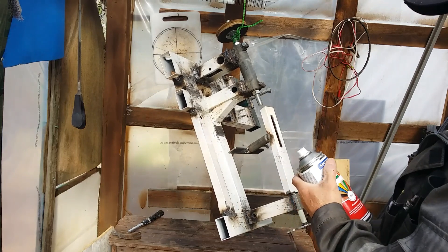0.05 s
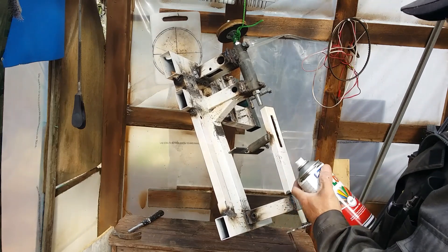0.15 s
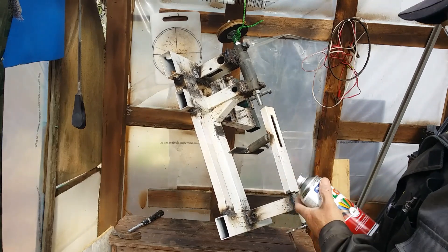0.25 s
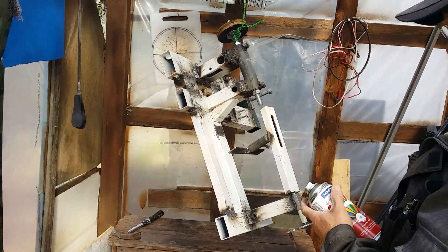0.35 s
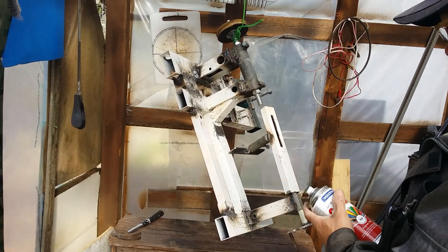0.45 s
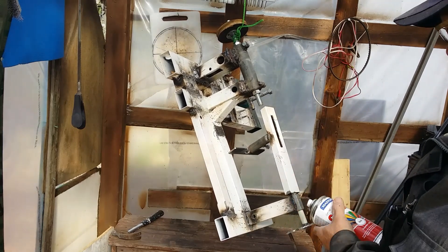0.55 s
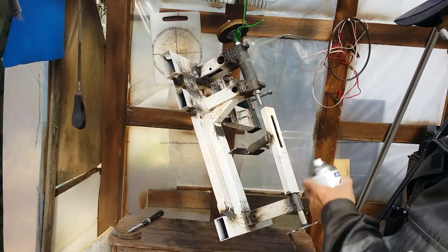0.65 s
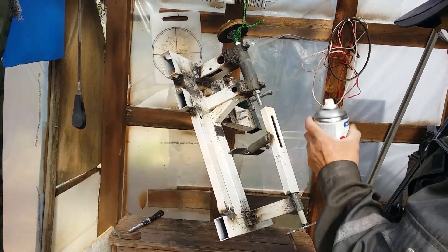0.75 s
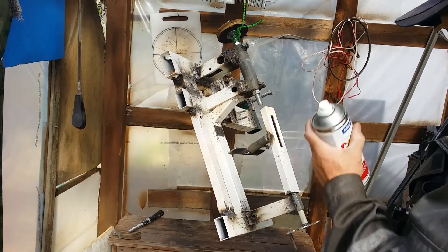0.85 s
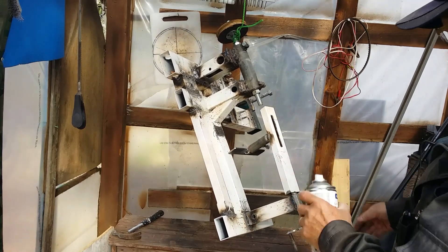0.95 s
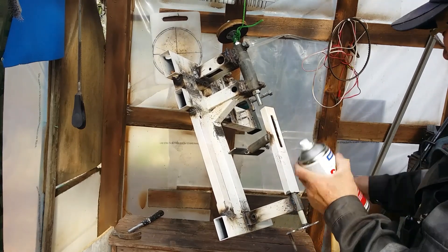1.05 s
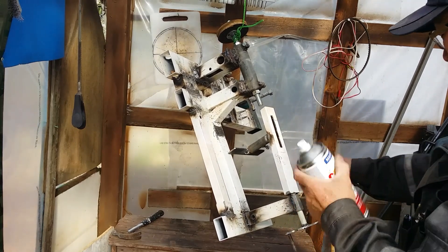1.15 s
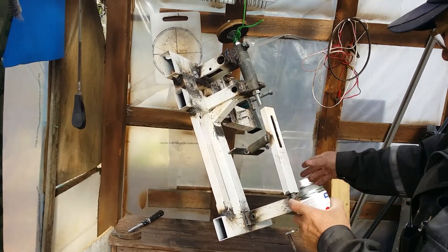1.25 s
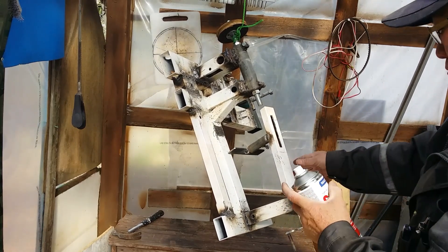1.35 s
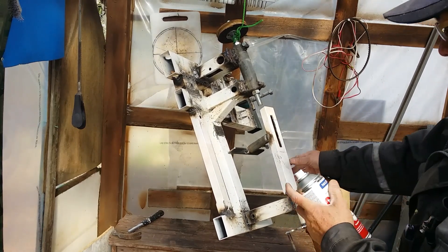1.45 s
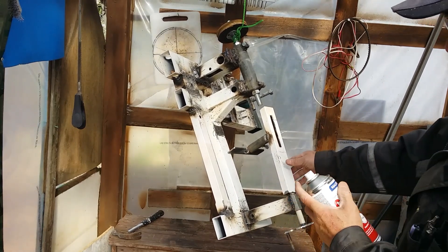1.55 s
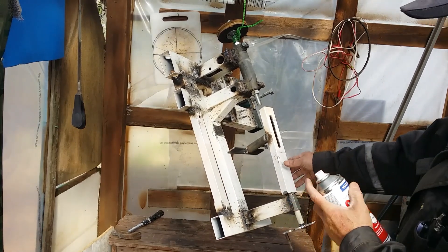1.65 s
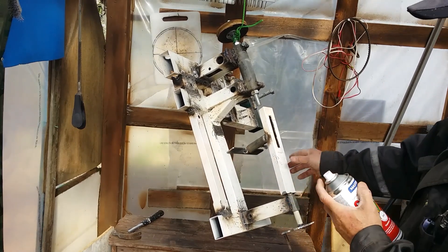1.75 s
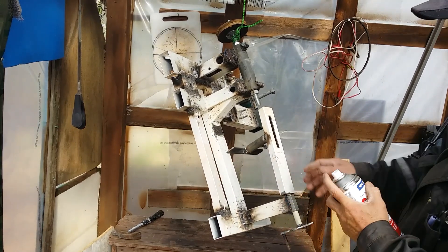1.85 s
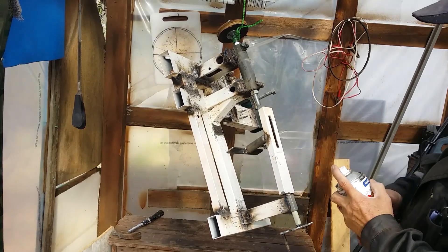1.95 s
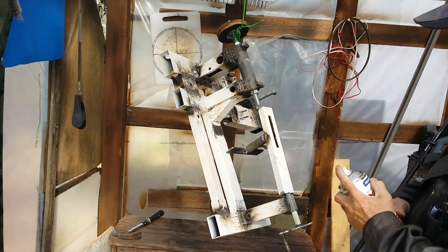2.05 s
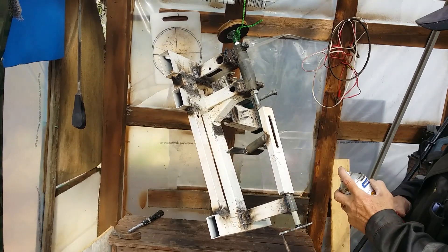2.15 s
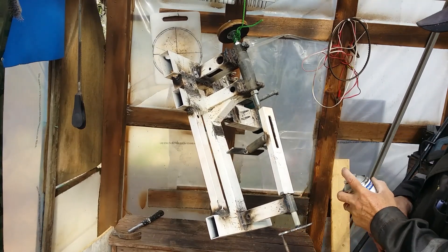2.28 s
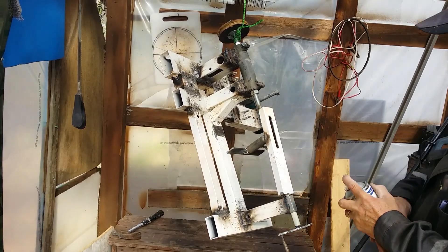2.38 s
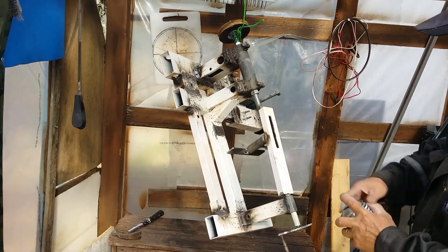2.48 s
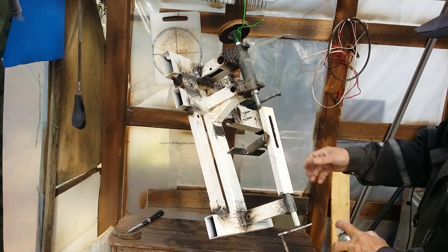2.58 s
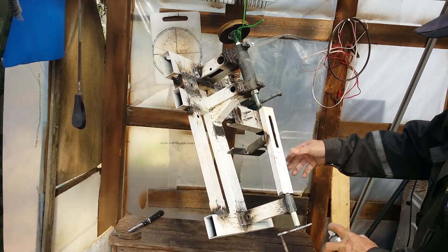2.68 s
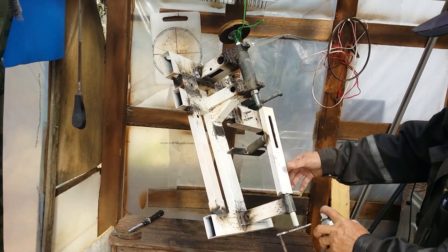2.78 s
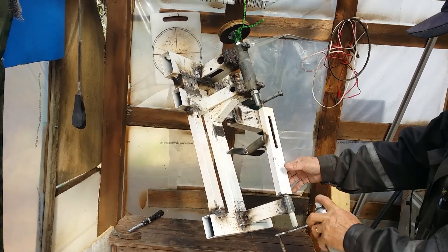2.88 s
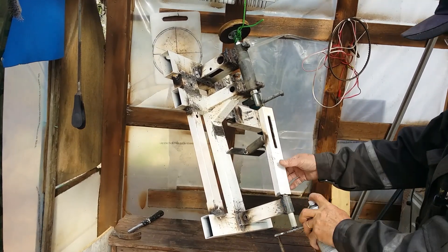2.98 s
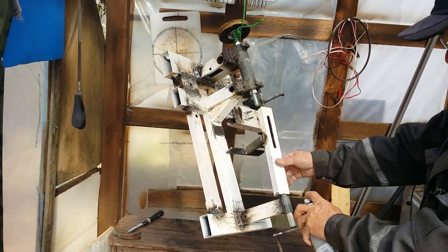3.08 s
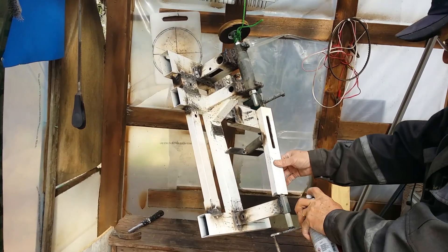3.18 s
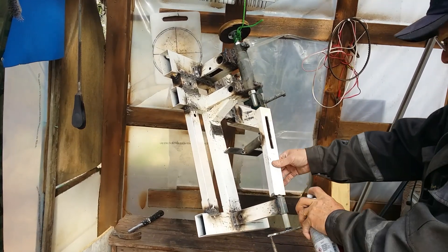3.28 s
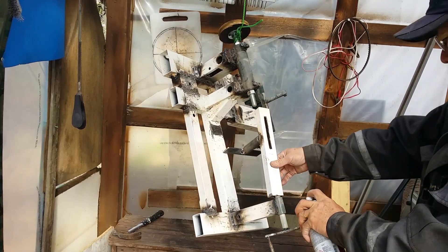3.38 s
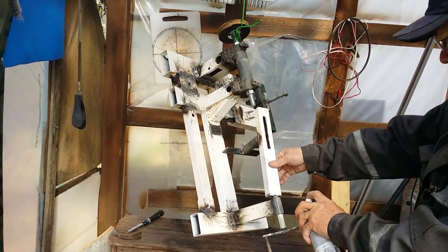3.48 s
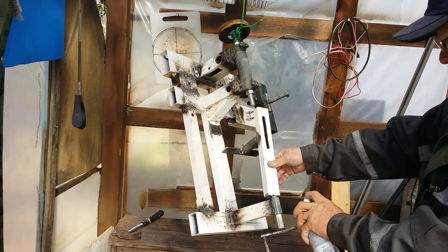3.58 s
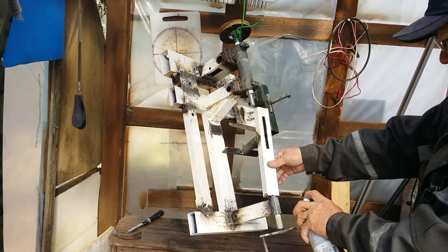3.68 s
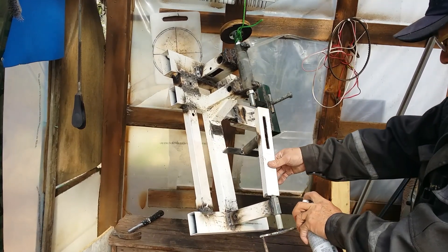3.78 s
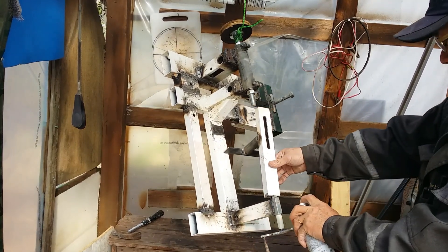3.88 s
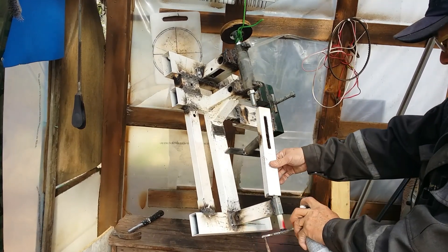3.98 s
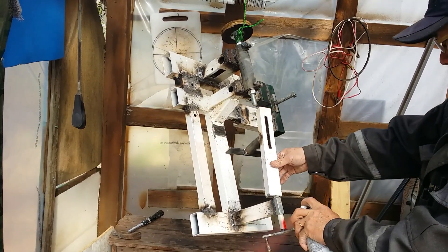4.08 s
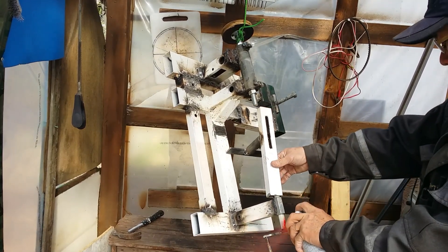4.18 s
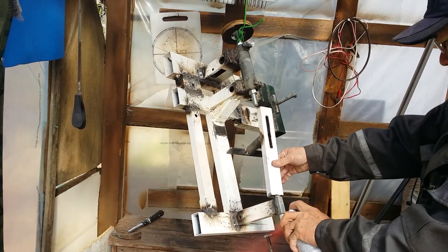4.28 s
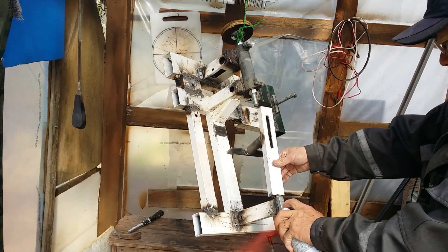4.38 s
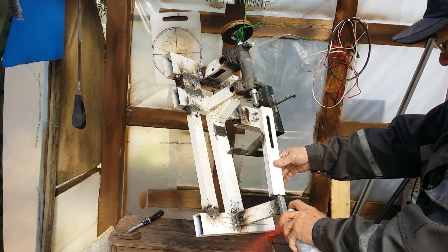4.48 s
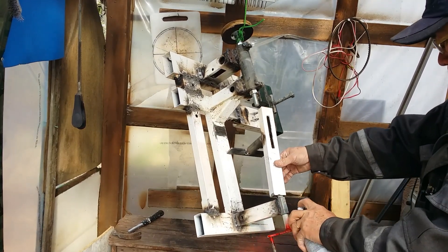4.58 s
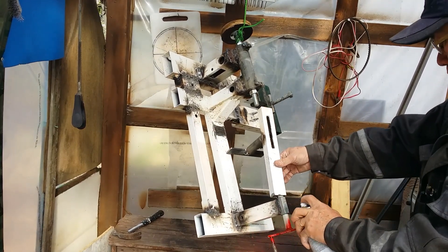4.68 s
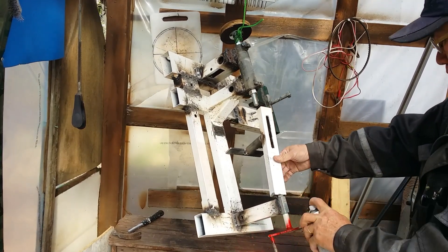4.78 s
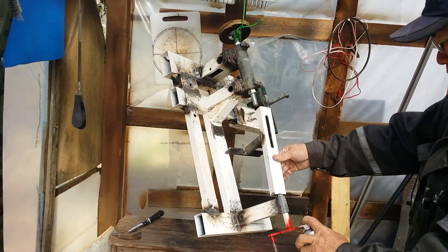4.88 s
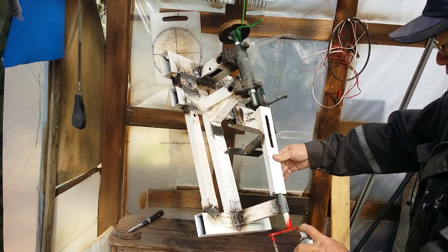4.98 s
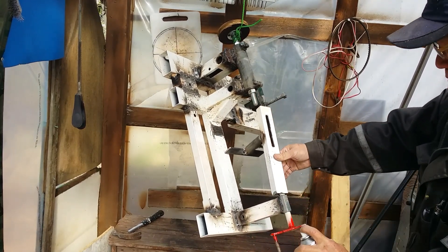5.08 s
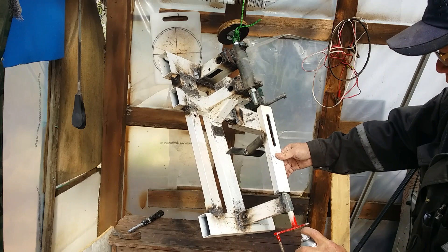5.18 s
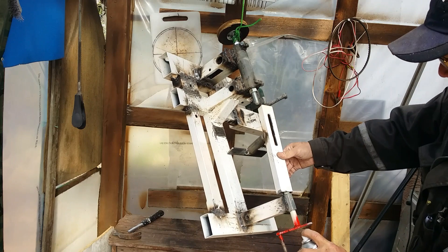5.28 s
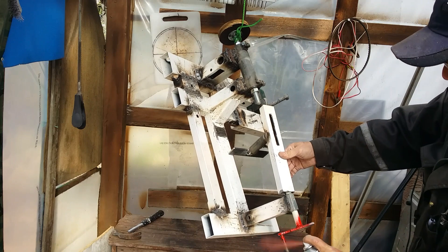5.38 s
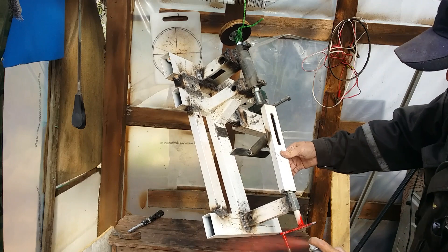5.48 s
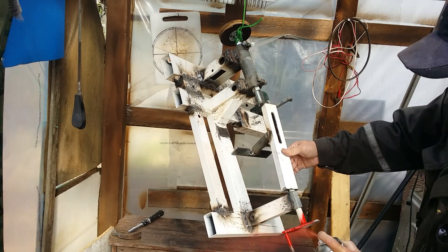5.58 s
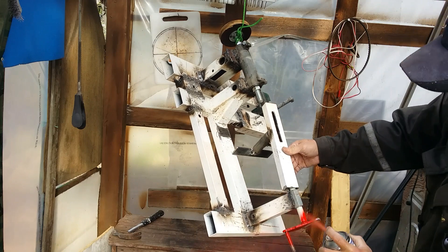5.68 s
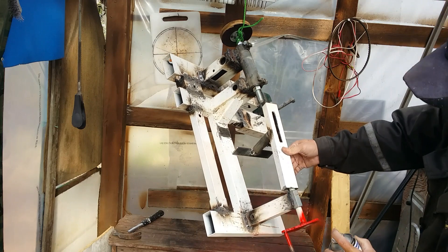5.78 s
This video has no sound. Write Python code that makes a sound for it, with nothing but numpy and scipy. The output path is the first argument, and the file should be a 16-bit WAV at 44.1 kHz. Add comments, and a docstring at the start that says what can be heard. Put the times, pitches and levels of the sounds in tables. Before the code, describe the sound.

In a small shed, the ball in a spray paint can rattles with sharp, irregular metallic knocks, along with soft bumps and some clothing rustle. After a quieter stretch with a brief brush of a hand on metal, the nearby can hisses for under a second, pauses, and hisses again briefly. A far engine hums very faintly behind it all.

```python
"""Spray can in a small shed

A spray can is swung about: its mixing ball knocks and skids inside the steel shell. A sleeve rustles,
a hand takes hold of a metal frame with a soft bump, and the nozzle lets out two turbulent jets.
Outdoor air noise and a far engine come through the thin walls; the recorder's noise suppressor
turns them down in the pauses."""
import sys
import numpy as np
from scipy import signal
from scipy.fft import rfft, irfft, next_fast_len
from scipy.io import wavfile
from scipy.ndimage import uniform_filter1d, map_coordinates

SR = 44100
rng = np.random.default_rng(int(sys.argv[2]) if len(sys.argv) > 2 else 0)


def wav_record(signal):
    """Record a signal, one row per channel, as 16-bit PCM in the file named by sys.argv[1]."""
    frames = np.transpose(np.atleast_2d(signal))
    bounded = np.clip(frames, -1, 1)
    # unit amplitude maps onto the largest positive 16-bit level
    quanta = np.round(bounded * 32767).astype(np.int16)
    wavfile.write(sys.argv[1], SR, quanta)


N = 257544
TIME = np.arange(N) / SR

# dull noise of moving air: (frequency [Hz], level [dB])
DULL_AIR = [(45, -23.5), (75, 1), (100, 2.5), (140, -5), (190, 0), (280, 0.5), (450, -3.5), (950, -9.5),
            (1400, -17.5), (2500, -30), (6000, -55)]


def rattle(gain_db=20, chatter_per_s=36, chatter_hz=2086, scatter_octaves=0.28, spread_db=2.5):
    """The mixing ball knocks about the can, then chatters lightly on random spots as a swing dies."""
    # ball hits, with the finger's tap on the nozzle cap at 4.06 s among them; hollowness is high on the thin
    # side wall and low on the stiff ends: (time [s], strength [dB], hollowness [dB], ring centre of the spot
    # [Hz], skid [dB])
    hits = [(0.000, -30, -1.5, 1983, -3), (0.041, -38.5, 5, 1600, -6.5), (0.124, -48.5, 5, 2500, -11.5),
            (0.14, -37.5, 3.5, 1915, -14.5), (0.178, -29.5, -5.5, 2450, -0.5), (0.201, -24, -6.5, 1230, -6),
            (0.261, -39.5, -1.5, 2400, 4), (0.301, -45, 10, 1808, 0), (0.352, -34, 2, 2500, -4.5),
            (0.359, -34, -0.5, 2520, -4.5), (0.382, -36.5, -2.5, 1500, -6), (0.495, -35.5, -3.5, 2430, -12),
            (0.517, -36, -3, 2720, -0.5), (1.105, -36.5, 4, 2408, -7.5), (1.171, -31.5, 3, 2840, -11),
            (1.189, -26.5, 0.5, 2888, -10), (1.219, -15.5, 0, 2475, -3.5), (1.234, -21.5, -10, 2380, -4.5),
            (1.276, -29.5, 4, 1810, -5), (1.347, -32, 3.5, 1500, -16), (1.369, -31, 0.5, 2800, -4),
            (1.381, -32.5, 2, 1600, -3.5), (1.386, -14.5, -10.5, 4960, -14.5), (1.425, -31, 8, 2214, -4.5),
            (1.434, -31.5, 7, 2120, -6.5), (1.442, -30, 9, 1584, -13.5), (1.463, -35, 2, 1580, -3),
            (1.502, -36, -1.5, 5476, -8), (1.514, -17.5, -2.5, 5000, -2), (1.528, -21, -6.5, 4800, -8.5),
            (1.578, -38, 6, 2160, -5.5), (1.617, -36.5, 6, 1860, -4), (1.72, -47, 0, 2070, -10.5),
            (1.747, -27, -4, 2104, -3), (1.832, -27.5, -3.5, 4570, -9), (1.920, -21.5, -5.5, 2285, -12),
            (1.977, -37, -4, 2070, -2), (2.015, -43.5, 0, 2170, -0.5), (2.037, -27.5, -4, 2100, -26),
            (2.112, -39.5, -4.5, 2300, -11), (3.223, -67, 12.5, 1620, -0.5), (4.060, -54.5, 5.5, 3180, -5),
            (4.589, -52.5, 6.5, 2280, 1.5)]
    # runs of chatter: (start [s], length [s], strength [dB])
    chatter = [(0.402, .18, -41.5), (1.645, .06, -46), (2.13, .08, -47)]
    out = np.zeros((2, N))
    for time, *hit in hits:
        add(out, time, knock(*hit))
    for start, length, db in chatter:
        scatter = rng.uniform(-1, 1, (round(length * chatter_per_s), 3))
        for k, (late, force, spot) in enumerate(scatter):
            time = start + (k + 0.5 + 0.26 * late) / chatter_per_s
            spot_hz = chatter_hz * 2 ** (scatter_octaves * spot)
            add(out, time, knock(db + spread_db * force, hollow_db=1.5, spot_hz=spot_hz))
    return amp(gain_db) * out


def knock(db, hollow_db, spot_hz, skid_db=-3, wet_db=0.5, ring_send_db=-5):
    """One hit of the ball, a little to the left: contact noise, ringing steel and the shed's echo."""
    contact = ball_contact(db, hollow_db, skid_db)
    ring = shell_ring(hollow_db, spot_hz)
    send = contact + amp(ring_send_db) * ring
    heard = amp(wet_db) * signal.fftconvolve(send, shed_echo(), axes=1)
    add(heard, 0, (contact + ring) * amp([[1.2], [-1.2]]))
    return amp(db) * heard


def ball_contact(db, hollow_db, skid_db, rise_s=0.00028, crack_s=0.0046, skid_s=0.016, size=8192):
    """The ball cracks on the wall and skids on: a harder hit is brighter, a hollower spot fuller."""
    # ball against steel: (frequency [Hz], level [dB])
    spectrum = [(100, -33.5), (400, -20), (800, -12.5), (1150, -5.5), (2200, -0.5), (3000, -5), (4700, -1),
                (6300, -4), (8000, -5), (9800, -17), (12500, -11), (16000, -23.5)]
    t = np.arange(size) / SR
    crack = unit(diffuse(spectrum, size) * (1 - np.exp(-t / rise_s)) * np.exp(-t / crack_s))
    skid = unit(diffuse(spectrum, size) * np.exp(-t / skid_s))
    treble_db = -2 + 0.068 * (db + 30)  # a medium hit has a strength of -30 dB
    tone = [(2400, hollow_db), (3600, 0.002), (6000, 0.0012), (10000, treble_db)]
    return colour(crack + amp(skid_db) * skid, lambda hz: read(tone, hz))


def shell_ring(hollow_db, spot_hz, reach_octaves=0.19, belly_hz=2070, belly_octaves=0.15, size=8192):
    """The steel shell rings in the modes near spot_hz; a hollower spot rings more."""
    # shell modes: (frequency [Hz], level [dB], t60 [s])
    modes = [(1052, -7, 0.088), (1222, -4, 0.029), (1410, -5, 0.079), (1560, -0.5, 0.037),
             (1685, -0.5, 0.017), (1960, -8, .07), (2042, -5, 0.09), (2180, 0.5, 0.066),
             (2287, -2.5, 0.055), (2416, -1, 0.058), (2490, -6, 0.086), (2664, -9.5, 0.11),
             (2870, -2.5, 0.064), (3270, -3.5, .1), (4100, -1.5, 0.092), (4165, -3, .1), (4540, 2.5, .1),
             (4550, -0.5, .1), (4920, -5.5, 0.075), (5800, 0.5, .1), (5640, -1, .1)]
    hz, db, t60 = np.transpose(modes)[:, :, None]
    t = np.arange(size) / SR
    share = amp(db) / (1 + (np.log2(hz / spot_hz) / reach_octaves) ** 2)
    phase = rng.random((2, len(hz), 1))
    partials = share * np.exp(-np.log(1000) * t / t60) * np.sin(2 * np.pi * (hz * t + phase))
    # the belly, the middle of the side wall, rings most freely
    belly = np.exp(-(np.log2(spot_hz / belly_hz) / belly_octaves) ** 2)
    return amp(hollow_db + 5.5 * (belly - 1)) * unit(partials.sum(1))


def spray(gain_db=4, wet_db=-8, sputter_db=1, bounce_db=-12, drift=0.15, bounces=6):
    """The turbulent jet sputters slightly; echoes off frame and bench shift as the can moves."""
    # hiss of the jet: (frequency [Hz], level [dB])
    spectrum = [(500, -29.5), (900, -9.5), (1200, -5.5), (1380, -11.5), (1600, -4), (1930, -8.5),
                (2360, -4), (3200, -7), (4230, -2), (6050, 0.5), (10000, -2.5), (14000, -2.5),
                (15500, -1.5)]
    # nozzle presses: (press [s], time to open fully [s], release [s])
    presses = [(4.052, .104, 4.85), (5.546, 0.04, 5.9)]
    # the jet's level as the can is aimed about, one curve a press: (time [s], level [dB])
    aims = [
        [(4.16, -46), (4.232, -44.5), (4.272, -50), (4.37, -48), (4.694, -47.5), (4.744, -43.5), (4.774, -48),
         (4.788, -54), (4.85, -44)],
        [(5.6, -51), (5.628, -46.5), (5.734, -50.5), (5.774, -46.5), (5.84, -46.5)],
    ]
    flow = sum(valve(*press, aim) for press, aim in zip(presses, aims))
    jet = diffuse(spectrum) * flow * flutter(sputter_db, size=200)
    paths = rng.uniform([0.001, -1], [0.009, 1], (bounces, 2, 2))
    near = jet.copy()
    for k, ports in enumerate(paths):
        for port, (delay_s, sway_phase) in enumerate(ports):
            lag_s = delay_s * (1 + drift * np.sin(np.pi * (TIME / 2 + sway_phase)))
            echo = map_coordinates(jet[port], [(TIME - lag_s) * SR], order=3)
            near[port] += (-1) ** k * amp(bounce_db) * echo
    near /= np.sqrt(1 + bounces * amp(bounce_db) ** 2)
    room = signal.fftconvolve(near, shed_echo(), axes=1)[:, :N]
    return amp(gain_db) * (near + amp(wet_db) * room)


def valve(press_s, open_s, release_s, aim, shut_db_per_s=540):
    """The jet's gain for one press: the valve seeps, opens, holds while aimed, and snaps shut."""
    opening = np.clip((TIME - press_s) / open_s, 0, 1) ** 3
    aim_db = np.interp(TIME, *np.transpose(aim))
    shut_db = shut_db_per_s * np.maximum(TIME - release_s, 0)
    return opening * amp(aim_db - shut_db)


def bumps(rise_s=0.001, decay_s=0.013, size=8192):
    """Hand and can bump softly: a low push a little to the right, hardly ringing, and a dull puff."""
    # soft bumps: (time [s], level [dB], pitch [Hz], puff against push [dB])
    thuds = [(1.35, -35, 159, -8), (1.367, -39.5, 228, -4), (1.406, -37.5, 143.4, -8.5),
             (1.443, -48.5, 200, -5), (1.513, -48.5, 568, -1.5), (1.735, -42, 210, 3),
             (2.834, -46.5, 163, -11.5), (2.885, -57.5, 220, -15), (2.939, -55, 131, -10.5),
             (4.586, -49, 195, -22)]
    out, t = np.zeros((2, N)), np.arange(size) / SR
    envelope = (1 - np.exp(-t / rise_s)) ** 2 * np.exp(-t / decay_s)
    envelope /= envelope.max()
    for time, db, hz, puff_db in thuds:
        puff = diffuse([(hz / 3, -20), (hz, 0), (900, -5), (2000, -25), (8000, -60)], size)
        push = amp([[-2.5], [2.5]]) * np.sin(2 * np.pi * hz * t + np.array([[0.5], [-0.5]]))
        add(out, time, amp(db) * envelope * (push + amp(puff_db) * puff))
    return out


def sleeve(gain_db=1):
    """Cloth rubs in small uneven catches as the arm moves."""
    # cloth rustle: (frequency [Hz], level [dB])
    spectrum = [(200, -9.5), (900, 0), (2500, 2), (6000, 1), (9500, -4.5), (16000, -8.5)]
    # arm movements: (peak [s], level [dB], rise [s], fall [s])
    moves = [(.53, -51, .45, 0.15), (.72, -63.5, .25, .25), (.868, -57, .1, .1), (1.6, -53.5, .6, 0.84),
             (2.2, -55.5, .3, 0.086), (2.745, -61.5, 0.12, 0.097), (2.98, -67, .12, .45),
             (4.02, -71.5, .17, .2), (4.96, -68.5, .25, 0.31)]
    return amp(gain_db) * diffuse(spectrum) * swells(moves) * flutter(depth_db=0.8, size=250)


def hand_brush(gain_db=2):
    """The hand brushes the metal frame, catching twice."""
    # hand rubbing on metal: (frequency [Hz], level [dB])
    spectrum = [(90, -18), (200, 1.5), (520, -9.5), (780, -4), (1000, -3), (1150, -6), (1400, -3),
                (1750, -4), (2300, -8), (2800, -5.5), (3800, -11), (6500, -10), (15000, -30)]
    # catches: (peak [s], level [dB], rise [s], fall [s])
    catches = [(2.87, -45, 0.04, .028), (2.894, -47.5, 0.026, 0.062)]
    return amp(gain_db) * diffuse(spectrum) * swells(catches) * flutter(depth_db=1.6, size=100)


def rush():
    """A soft low rush swells under each spray."""
    # swells of dull noise: (peak [s], level [dB], rise [s], fall [s])
    surges = [(4.6, -57.5, 0.86, .42), (5.84, -61, .4, .4)]
    return diffuse(DULL_AIR) * swells(surges)


def air(rumble_db=-75, dull_db=-60, hiss_db=-75):
    """A steady bed of low outdoor air noise over a faint even hiss."""
    # deep rumble: (frequency [Hz], level [dB])
    rumble = [(15, -32.5), (30, -18), (45, 0), (56, 0.5), (75, -18.5), (160, -46.5)]
    # nearly flat hiss: (frequency [Hz], level [dB])
    hiss = [(100, 0), (1000, 1.5), (2000, 1), (3500, 4.5), (8000, 1.5), (16000, 0.5)]
    low_air = amp(rumble_db) * diffuse(rumble) + amp(dull_db) * diffuse(DULL_AIR)
    return low_air + amp(hiss_db) * diffuse(hiss)


def far_engine(octave_db=-7, waver_db=1):
    """A far engine hums at its firing rate and the octave above; it slows, then picks up again."""
    # engine run: (time [s], firing rate [Hz], level [dB])
    run = [(0, 58, -75.5), (1.2, 56, -71.5), (2.1, 51.1, -62), (3.0, 46.1, -64.5), (3.7, 42.83, -73),
           (4.8, 42, -64.5), (5.3, 45.26, -69), (5.84, 49.7, -59)]
    times, hz, db = np.transpose(run)
    phase = 2 * np.pi * np.cumsum(np.interp(TIME, times, hz)) / SR
    hum = np.sin(phase) + amp(octave_db) * np.sin(2 * phase)
    return amp(np.interp(TIME, times, db)) * hum * flutter(waver_db, size=8000)


def far_drone(first_peak_hz=181.2, climb_hz_per_s=28):
    """A faint far tone swells briefly and climbs slowly in pitch."""
    # swells of the drone: (peak [s], level [dB], rise [s], fall [s])
    surges = [(.57, -57, 0.14, .25), (.85, -65, 0.098, .12)]
    hz = first_peak_hz + climb_hz_per_s * (TIME - surges[0][0])
    return swells(surges) * np.sin(2 * np.pi * np.cumsum(hz) / SR)


def shed_echo(build_s=0.0049, size=16384):
    """The shed's echo from one position of the can: it builds fast and dies soonest in the low mids."""
    # reverb time: (frequency [Hz], t60 [s])
    decay = [(150, 0.17), (600, 0.059), (1500, 0.11), (4000, 0.14), (9000, 0.16), (15000, .17)]
    white = diffuse([(20, 0), (20000, 0)], size)
    hz, t, bands = signal.stft(white, SR, nperseg=256)
    fade = amp(-60 * t / read(decay, hz)[:, None])
    tail = signal.istft(bands * fade, SR, nperseg=256)[1][:, :size]
    return unit(tail * (1 - np.exp(-np.arange(size) / SR / build_s)))


def suppress(x, treble_hz=2000, quiet_db=-73, busy_db=-53, release_s=0.2, attack_s=0.034, size=512):
    """Noise suppressor: clamps the steady floor in pauses, lets go slowly while the treble is busy."""
    # depth in a full pause: (frequency [Hz], cut [dB])
    depth = [(50, 10), (150, 10.5), (450, 12), (1100, 9), (2600, 1.5)]
    hz, _, bands = signal.stft(x, SR, nperseg=size)
    power = np.mean(abs(bands) ** 2, 0)
    treble_db = 10 * np.log10(power[hz > treble_hz].sum(0) + 1e-20)
    pause = np.clip((busy_db - treble_db) / (busy_db - quiet_db), 0, 1)
    poles = np.exp(-size / 2 / SR / np.array([release_s, attack_s]))
    pause = np.max([signal.lfilter([1 - pole], [1, -pole], pause) for pole in poles], 0)
    power = abs(uniform_filter1d(uniform_filter1d(power, 3, 0), 3, 1)) + 1e-20
    floor = amp(6) ** 2 * np.median(power, 1)[:, None]  # up to 6 dB over the median counts as steady
    steady = np.minimum(floor / power, 1)
    gain = 1 - steady * (1 - amp(-read(depth, hz)[:, None] * pause))
    return signal.istft(bands * gain, SR, nperseg=size)[1][:, :N]


def diffuse(spectrum, size=N, alike_hz=1500):
    """Noise from all sides, rms 1: two spaced microphone ports agree only in the bass."""
    span = next_fast_len(size)
    hz = np.fft.rfftfreq(span, 1 / SR)
    mid, side = rfft(rng.standard_normal((2, span)))
    coherence = np.sinc(hz / alike_hz)
    mid *= np.sqrt(1 + coherence)
    side *= np.sqrt(1 - coherence)
    noise = irfft(np.array([mid + side, mid - side]) * amp(read(spectrum, hz)), span)
    return unit(noise[:, :size]) * np.sqrt(size)


def swells(rows, roundness=1.3):
    """A gain made of swells, each 20 dB down rise_s before its peak and fall_s after."""
    gain = np.zeros(N)
    for peak_s, db, rise_s, fall_s in rows:
        away = np.maximum((peak_s - TIME) / rise_s, (TIME - peak_s) / fall_s)
        gain += amp(db - 20 * np.minimum(away, 10) ** roundness)
    return gain


def flutter(depth_db, size):
    """A random gain that wavers over about size samples."""
    return amp(depth_db * np.sqrt(size) * uniform_filter1d(rng.standard_normal(N), size))


def colour(x, gain_db):
    """Minimum-phase EQ; gain_db is a function of frequency."""
    size = x.shape[-1]
    cepstrum = irfft(gain_db(np.fft.rfftfreq(size, 1 / SR)) * np.log(10) / 20, size)
    cepstrum[1:size // 2] *= 2
    cepstrum[size // 2 + 1:] = 0
    return irfft(rfft(x) * np.exp(rfft(cepstrum)), size)


def amp(db):
    """Decibels to gain."""
    return 10 ** (np.asarray(db) / 20)


def read(points, hz):
    """A table's value at hz, on a log-frequency axis."""
    points_hz, values = np.transpose(points)
    return np.interp(np.log(hz + 1), np.log(points_hz + 1), values)


def unit(x):
    """Scales each channel to an energy of 1."""
    return x / np.sqrt(np.sum(x ** 2, -1, keepdims=True) + 1e-20)


def add(mix, start_s, sound):
    """Mixes a sound in at start_s."""
    part = mix[:, max(round(start_s * SR), 0):][:, :sound.shape[-1]]
    part += sound[..., :part.shape[-1]]


def scene():
    """Everything that sounds in the shed."""
    return (bumps() + spray() + sleeve() + hand_brush()
            + air() + far_engine() + far_drone() + rattle() + rush())


def record(dry, cutoff_hz=15550):
    """Noise suppression, the colour of each microphone port, then a steep low-pass."""
    # tone difference between the ports: (frequency [Hz], left minus right [dB])
    balance = [(100, -3.5), (500, -1), (1700, -3.5), (2300, 1), (3000, -1.5), (4500, 0.5), (5300, 5.5),
               (6400, 1.5), (7000, -2.5), (7900, -5.5), (9500, -1.5), (12000, -1), (14500, 2.5)]
    left, right = np.pad(suppress(dry), ((0, 0), (0, 2 ** 18 - N)))
    left = colour(left, lambda hz: read(balance, hz) / 2)[:N]
    right = colour(right, lambda hz: -read(balance, hz) / 2)[:N]
    lowpass = signal.firwin(511, cutoff_hz, window=("kaiser", 9), fs=SR)
    return signal.oaconvolve(np.array([left, right]), lowpass[None], "same")


dry = scene()
out = record(dry)
wav_record(out)
```